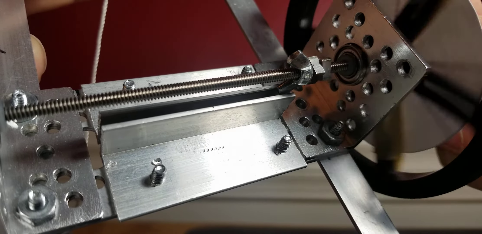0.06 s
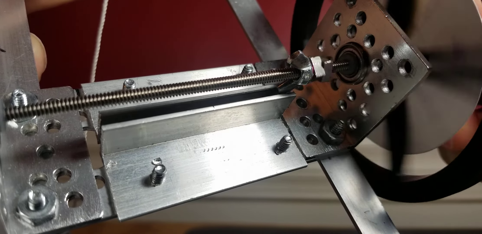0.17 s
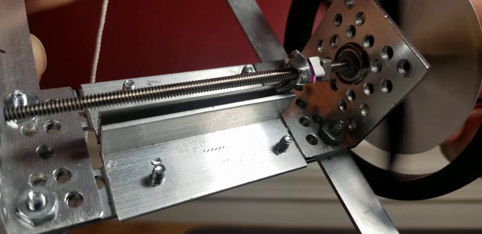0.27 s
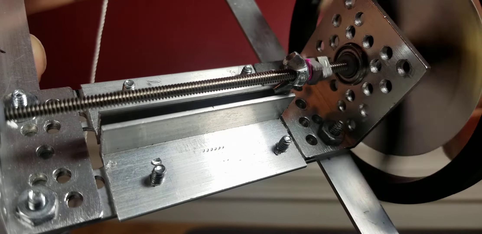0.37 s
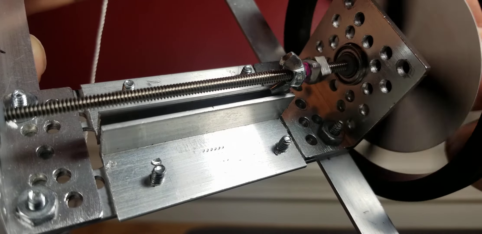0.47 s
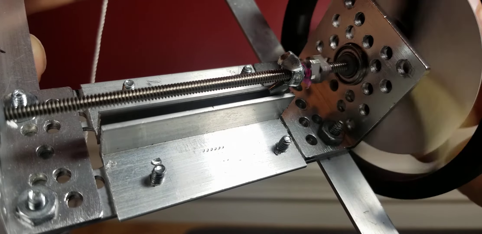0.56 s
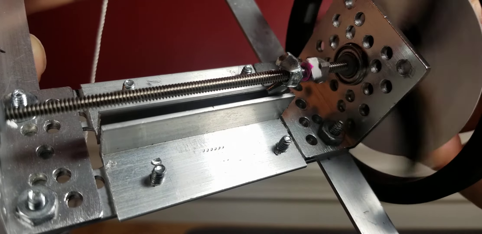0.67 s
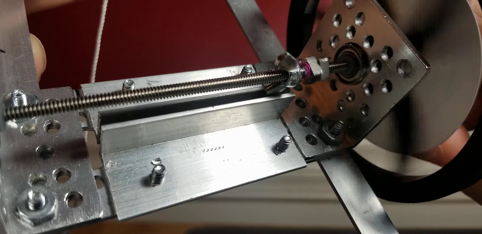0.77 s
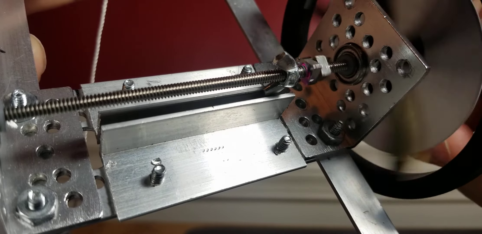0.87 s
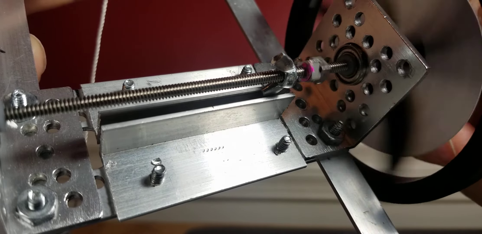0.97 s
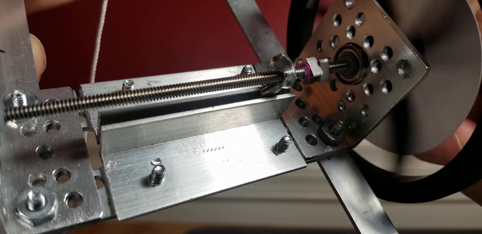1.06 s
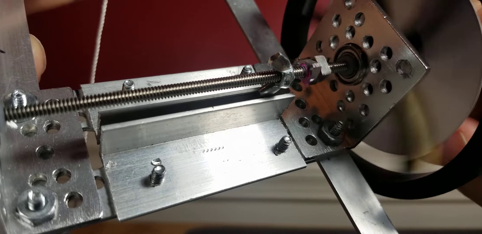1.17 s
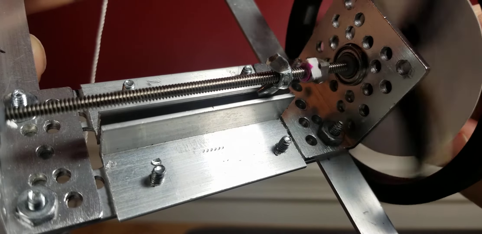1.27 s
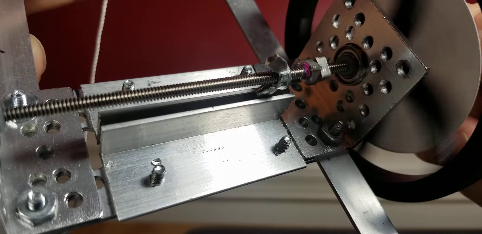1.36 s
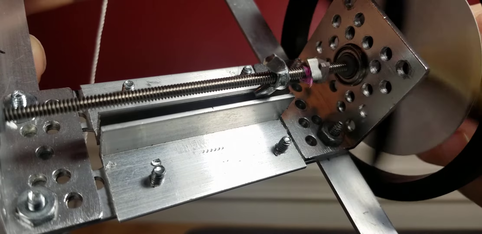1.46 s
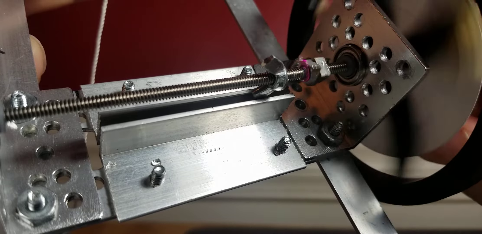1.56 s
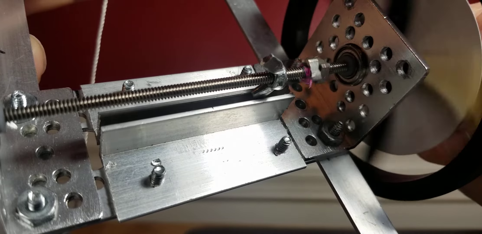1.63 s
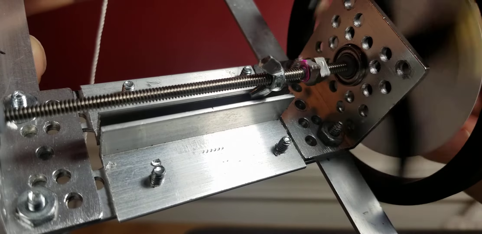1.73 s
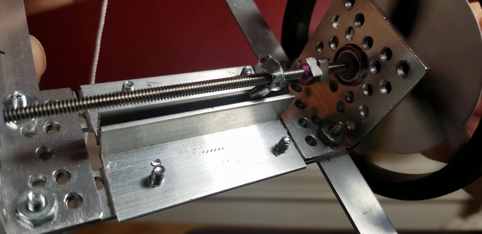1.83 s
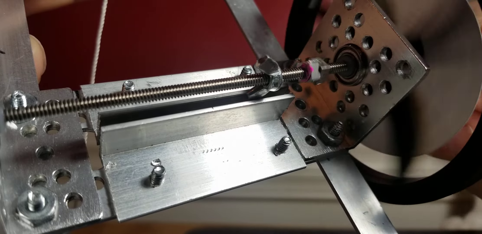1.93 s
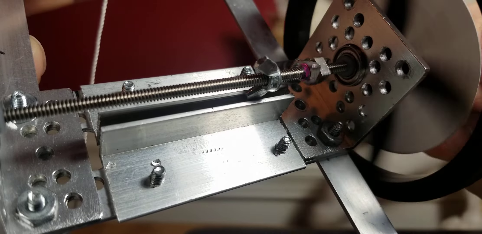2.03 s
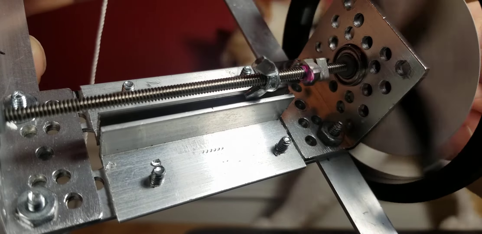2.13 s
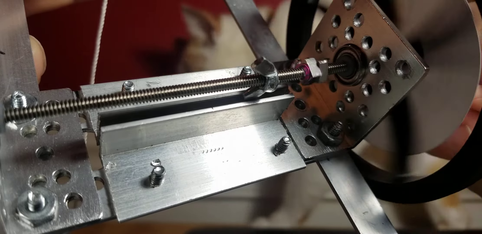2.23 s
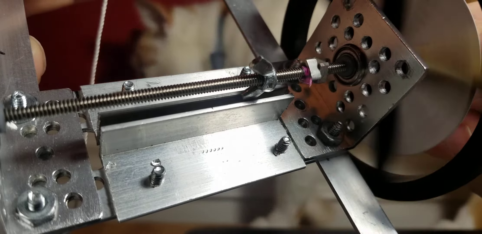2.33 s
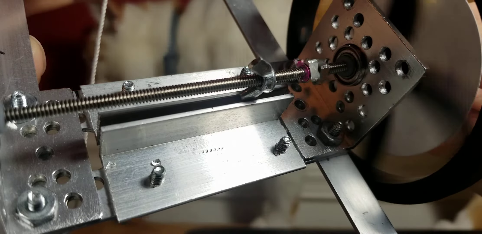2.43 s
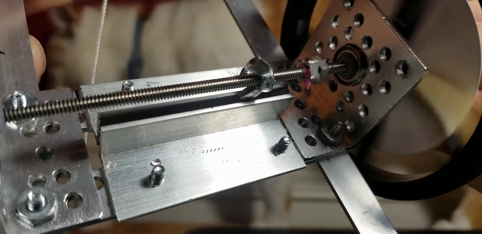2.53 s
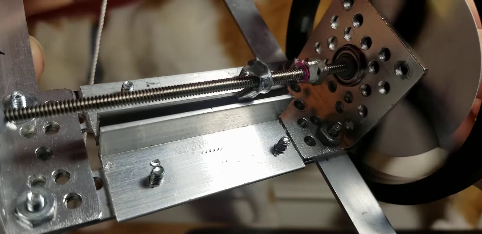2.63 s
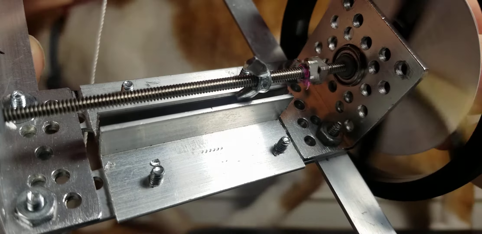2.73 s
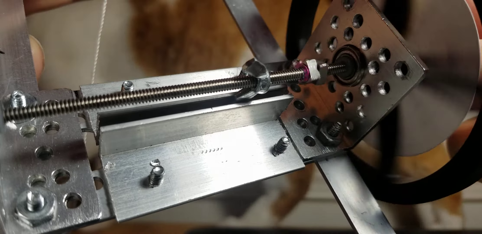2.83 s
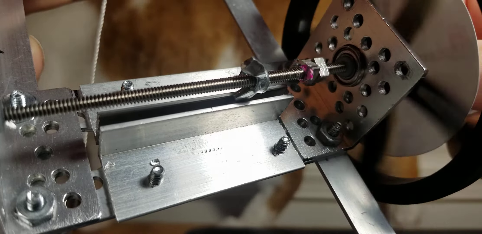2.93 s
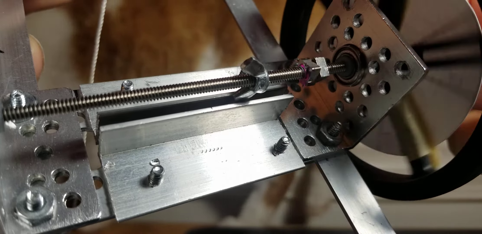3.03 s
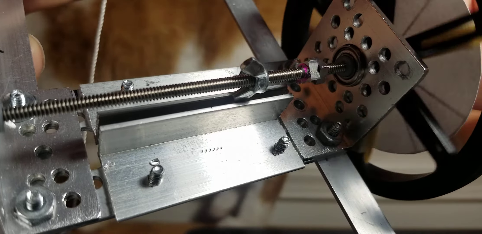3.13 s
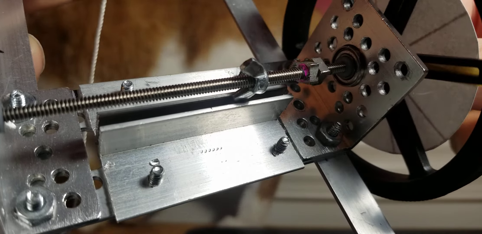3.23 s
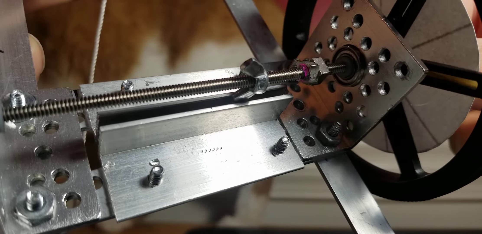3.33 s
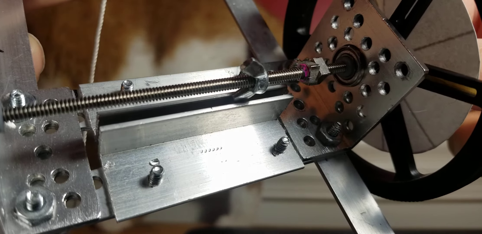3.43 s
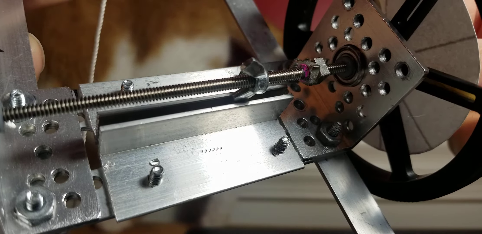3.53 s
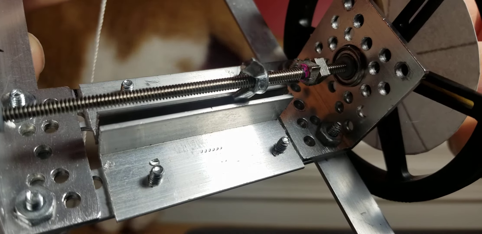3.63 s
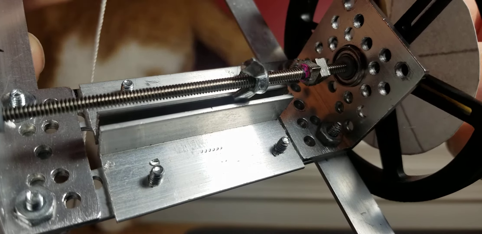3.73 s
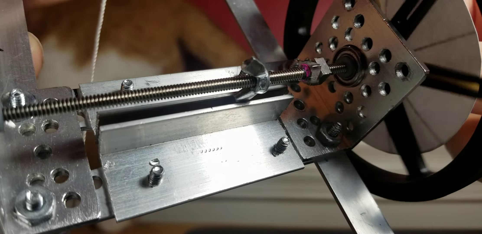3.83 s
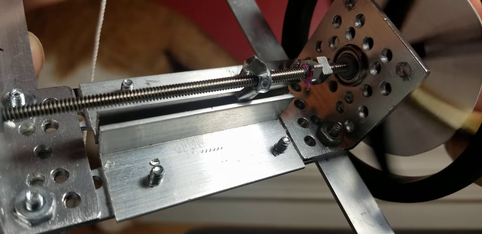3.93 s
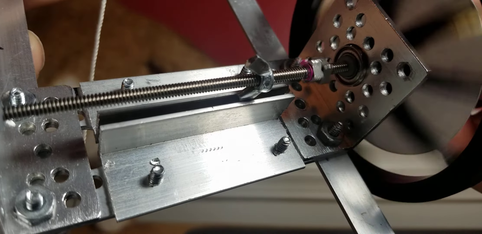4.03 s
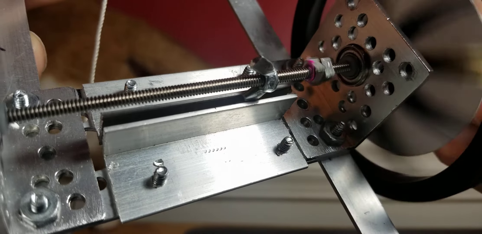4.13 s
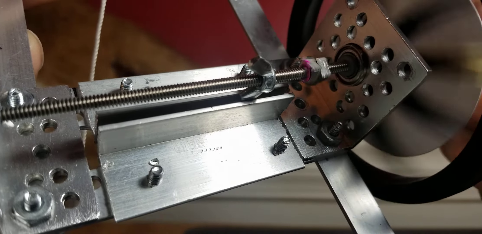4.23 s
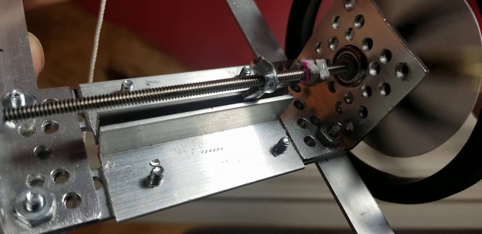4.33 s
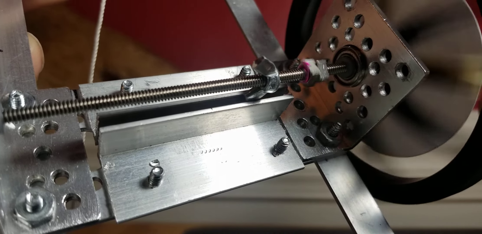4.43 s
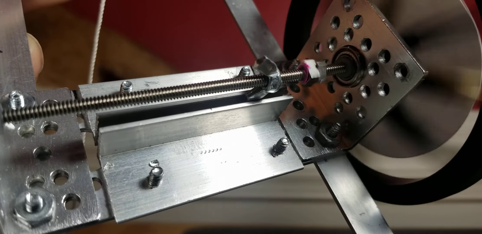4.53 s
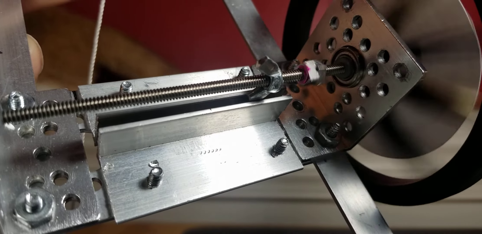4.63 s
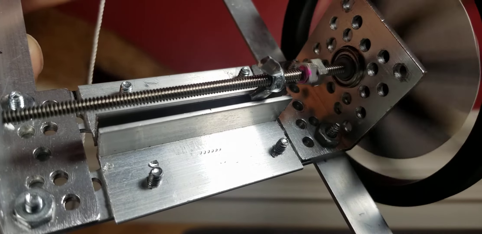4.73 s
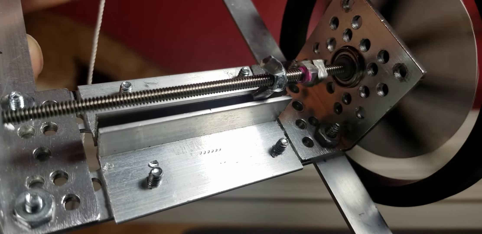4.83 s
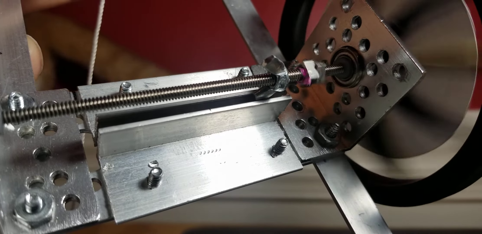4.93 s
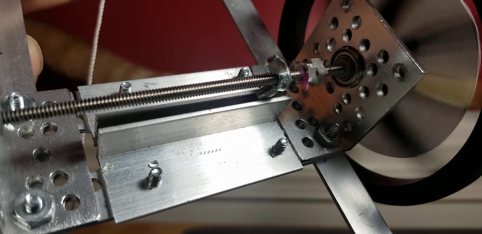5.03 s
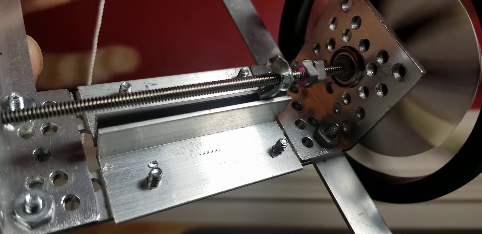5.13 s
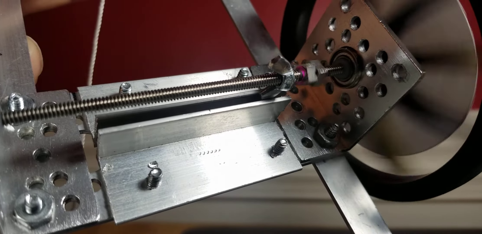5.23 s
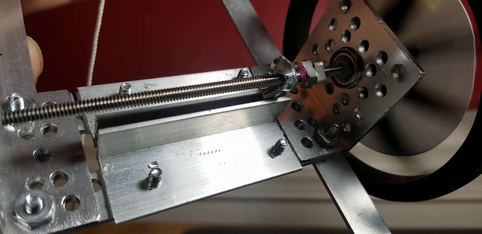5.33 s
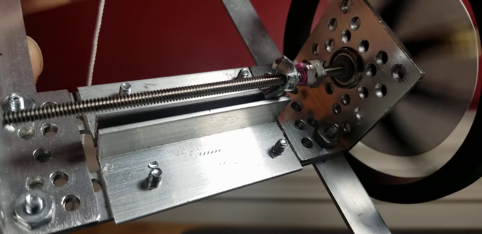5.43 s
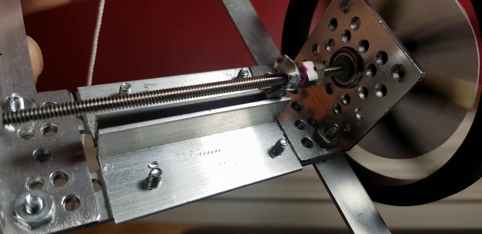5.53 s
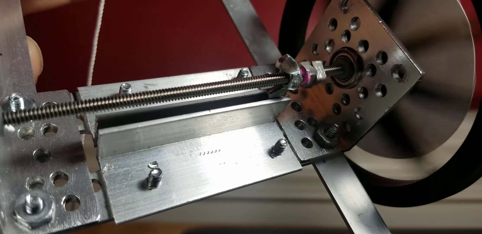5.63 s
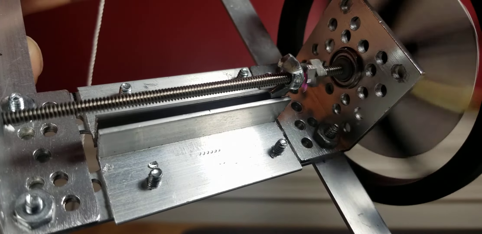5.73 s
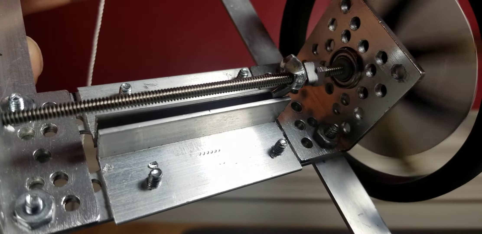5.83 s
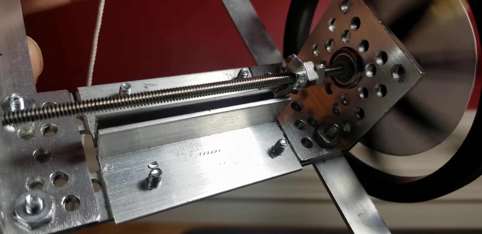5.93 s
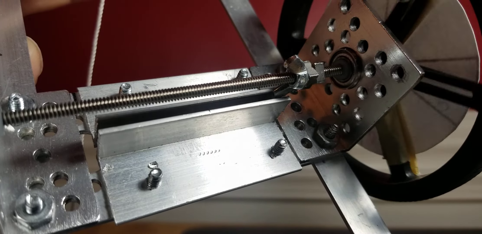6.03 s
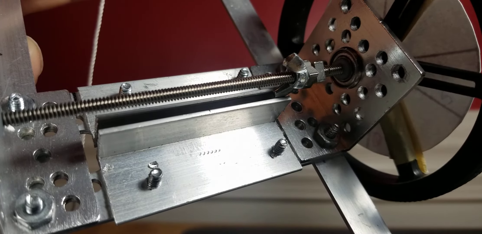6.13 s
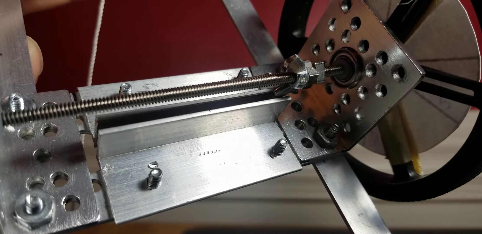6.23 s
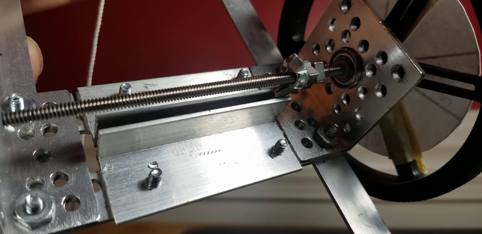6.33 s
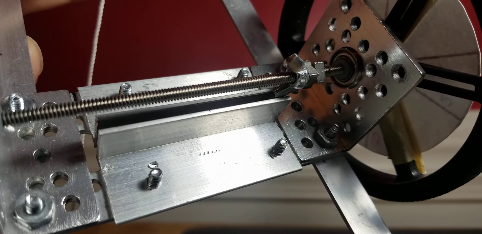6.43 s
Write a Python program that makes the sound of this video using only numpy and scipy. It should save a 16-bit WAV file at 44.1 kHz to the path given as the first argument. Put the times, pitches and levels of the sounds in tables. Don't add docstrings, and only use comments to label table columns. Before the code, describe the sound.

Close metallic buzzing rattle of a loose nut on a spinning threaded axle, two bursts, handling thumps, a brief squawk, then an abrupt stop.

```python
import sys
import numpy as np
from scipy import signal
from scipy.fft import rfft, irfft, next_fast_len
from scipy.io import wavfile
from scipy.ndimage import uniform_filter1d

SR = 44100
rng = np.random.default_rng(int(sys.argv[2]) if len(sys.argv) > 2 else 0)


def materialize(psi):
    bounded = np.clip(np.atleast_2d(psi).T, -1, 1)
    quanta = np.round(bounded * 32767).astype(np.int16)
    wavfile.write(sys.argv[1], SR, quanta)


def elevation(decibels):
    levels = np.asarray(decibels, float)
    return 10 ** (levels / 20)


N = 286209
T = np.arange(N) / SR
HZ = np.fft.rfftfreq(2 * next_fast_len(N // 2 + 6000, True), 1 / SR)

# time_s, drag_db, frame_looseness_db
COASTING = [
    [(0.0, -67, -64), (0.178, -62.5, -74), (0.318, -55.5, -62.5), (0.44, -56, -58.5), (0.74, -58.5, -62.5)],
    [(2.0, -53, -60), (2.15, -67, -73), (2.298, -57, -61), (2.438, -57.5, -65), (2.978, -57.5, -69),
     (3.282, -55, -90), (3.732, -60, -89), (3.87, -64.5, -75), (3.92, -54, -57)],
    [(5.87, -44, -78), (5.966, -67.5, -73), (6.066, -58, -81), (6.126, -68, -99), (6.21, -81, -99),
     (6.27, -97.5, -99), (6.49, -98, -99)],
]
# frequency_hz, level_db
FRICTION_COLOUR = [(290, -52), (500, -15.5), (900, -17.5), (1190, -8.5), (1550, -8), (1800, -11),
                   (2230, -12), (2850, -15.5), (3340, -5), (5800, -1.5), (9090, -8.5), (11300, -3.5),
                   (16000, -3.5)]
# time_s, pitch_hz, level_db
BEARING_MOAN = [(2.9, 2020, -79), (3.1, 1960, -79), (3.33, 1950, -71), (3.4, 1530, -76), (3.7, 1530, -72),
                (3.8, 1550, -70), (3.86, 1500, -88)]
# time_s, pitch_hz, level_db
BEARING_SQUAWK = [(3.87, 3005, -66), (3.9, 2900, -46.5), (4.0, 2696, -43), (4.1, 2455, -46),
                  (4.14, 2510, -85.5)]
# time_s, share_removed
FINGER_DAMPING = [(1.99, 0.02), (2.04, 0.72), (2.5, 0.66), (2.6, 0.072), (2.95, 0.36), (3.1, 0)]
# frequency_hz, width_hz, level_db
CASE_MODES = [(54.4, 28.5, 0), (112.2, 58, -2.5), (162.7, 96, -8.5), (313.6, 114, -1), (530, 283, -11)]
# time_s, effort_db, firmness_db (gained by each higher resonance)
HAND_GRIP = [(0, -57.5, 6.5), (.27, -53, -2), (.6, -53.5, -3), (.8, -45.5, -3.5), (1.01, -53.5, 1),
             (1.43, -51, -7), (1.75, -50, -7), (2.0, -52, -4.5), (2.5, -60, -9.5), (2.91, -65, -0.5),
             (3.6, -59.5, -9.5), (3.76, -60.5, -6), (3.96, -51.5, -4.5), (4.36, -56, -6), (4.64, -58.5, -1),
             (5.3, -59.5, 0.5), (5.75, -56, -2.5), (6.3, -57, -15.5)]
# peak_s, peak_db, brightness (0 deep to 2 upper), t60_s
FINGER_JOLTS = [(.05, -53, 0.53, 0.42), (.36, -38, 0.32, 0.87), (.47, -38, 0.33, 0.69),
                (.87, -34.5, 0.63, 0.62), (1.02, -54, 2, 2.7), (1.598, -35, 1.51, 0.63),
                (2.28, -44, 0.35, 1.6), (2.55, -48.5, 0.16, 1.9), (4.01, -39, 0.53, 0.71),
                (4.109, -41.5, 2, 0.51), (4.119, -29, 0.31, 0.38), (5.351, -32, 1.12, 0.64),
                (5.42, -42, 0.54, 0.6), (5.48, -36.5, 0.91, 0.68), (5.93, -41, 0.54, 0.54),
                (5.98, -42, 0.15, 0.11), (6.02, -47.5, 1.55, 0.54)]
# start_s, peak_db, pitch_hz, t60_s, left_right_db
HAND_THUMPS = [(0.009, -33.5, 54, 0.92, 3.5), (0.047, -34, 197, 0.26, 7), (0.35, -28, 46.8, 0.41, 4),
               (0.498, -32.5, 191, 0.17, 6), (0.858, -16.5, 208, 0.063, 5), (1.59, -26, 331.5, 0.054, -3),
               (1.588, -33.5, 581, 0.085, -1), (4.108, -28, 58, 0.22, -18), (4.137, -36, 95.2, 0.43, -15),
               (5.34, -4, 181, 0.026, 5.5), (5.35, -30, 55.7, 0.53, 5), (5.472, -18, 206, 0.11, 4),
               (5.91, -36.5, 312, 0.047, 7), (6.004, -17.5, 449, 0.031, 13), (6.016, -19, 356, 0.02, -4),
               (6.043, -43, 383, 0.039, 6)]
# start_s, peak_db, pitch_hz, t60_s,
# left_right_db
SOFT_BUMPS = [(2.546, -56, 610, 0.05, -3), (2.583, -49, 625, 0.076, -1), (6.008, -38.5, 990, 0.037, 8),
              (1.544, -34.5, 185, 0.23, 0), (1.612, -31.5, 202.6, 0.2, 5), (6.016, -26, 100, 0.1, -6),
              (6.146, -34.5, 103, 0.064, -13), (6.002, -35, 4527, 0.045, 6), (6.002, -37, 8100, .03, 6),
              (6.015, -43, 5600, .04, 6), (5.5, -32, 172, 0.34, 5), (5.36, -27.5, 190, 0.3, 5)]
# time_s, pitch_hz, level_db
ELECTRIC_WHINE = [(0, 13400, -77), (.72, 13350, -76), (.8, 13400, -99), (6.05, 13400, -99),
                  (6.15, 13500, -89), (6.49, 13700, -89)]
# start_s, peak_db, low_share_db, left_right_db
AXLE_TICKS = [(0.212, -54, -1, 7), (0.2882, -41, -12, 8), (0.4444, -30, -18, 6.5), (0.482, -44, -16, 15.5),
              (0.508, -47.5, 2.5, 3), (0.5707, -29.5, -22.5, 15.5), (0.631, -54, -22, 25.5),
              (0.641, -43.5, -11.5, 19), (2.088, -55, 2, 3), (2.169, -25.5, -21.5, 7),
              (2.1797, -43, -10, 5), (2.2798, -47, -7, 7), (2.306, -39, -10.5, 8.5), (2.353, -52, -1, 13),
              (2.544, -25.5, -30, 17), (2.58, -26, -30, 20), (2.5868, -28, -23, 18.5), (2.598, -48, -16, 8),
              (2.613, -52, -20, 8), (2.62, -22.5, -36, 15), (2.7893, -27, -20.5, 4.5),
              (2.7925, -38, -27, 12), (2.797, -30, -22, 5), (2.809, -35, -18, -1), (2.823, -33, -22, 9),
              (2.8395, -44, -7, -11), (2.8783, -59.5, 11.5, 7)]
# start_s, peak_db,
# low_share_db, left_right_db
SPIN_CLICKS = [(0.741, -34, -8, 4), (0.7615, -26, -25, 10), (3.8017, -32, -21, 6),
               (3.904, -23.5, -24, 2.5), (4.249, -19, -28, 4), (4.26, -22, -24, 9), (4.459, -22, -33, 4),
               (4.4998, -16.5, -25.5, 8), (6.002, -16.5, -30.5, 9.5), (6.0124, -42, -7, 3),
               (6.087, -38, -23, 6), (0.043, -57, -11, -2)]
# start_s, length_s, peak_db, low_share_db, left_right_db
PLAY_SCRAPES = [
    (0.025, 0.16, -64.5, 0, -1),
    (0.419, 0.011, -52, -1.5, 10.5),
    (2.255, 0.01, -39, -17, 8),
    (2.537, 0.013, -37.5, -13, 5.5),
    (2.576, 0.015, -27, -22, 0),
    (2.763, 0.036, -30.5, -25.5, 14),
    (2.82, 0.023, -47, -10, 3),
    (6.001, 0.019, -41, -7.5, -4),
]
# time_s, contact_db, nut_ring_db
CONTACT_OUT = [(0.737, -53.5, -3), (0.763, -38.5, -12), (0.79, -40, -20), (0.89, -40, -7),
               (1.08, -41.5, -10), (1.22, -41.5, -10), (1.52, -42.5, -2.5), (1.997, -42.5, -5.5),
               (2.008, -85, -11)]
CONTACT_BACK = [(3.93, -100, -9), (3.94, -41, -20), (3.988, -31.5, -45), (4.17, -29.5, -30),
                (4.27, -30.5, -12.5), (4.52, -33.5, -4), (5.2, -38, -2.5), (5.857, -36.5, -9),
                (5.877, -72, -3.5)]
# time_s, peak_db
FIRM_BLOWS_OUT = [(0.762, -22.5), (0.7851, -25.5), (0.821, -26), (0.8321, -25.5), (0.8666, -26.0),
                  (0.8828, -28), (0.893, -24.0), (0.9332, -23.5), (0.9385, -35), (0.961, -25.0),
                  (0.9897, -29), (1.0115, -27.5), (1.0404, -23.5), (1.0577, -27.5), (1.0853, -28),
                  (1.0909, -29.5), (1.1197, -29.5), (1.143, -25.5), (1.1649, -24.5), (1.1994, -26.0),
                  (1.2103, -27.0), (1.2226, -25.5), (1.256, -26.5), (1.2735, -26.5), (1.307, -26.5),
                  (1.3306, -28.5), (1.353, -25.5), (1.3645, -27.0), (1.3759, -25.0), (1.399, -26.5),
                  (1.428, -35), (1.454, -28.5), (1.466, -34), (1.4996, -31), (1.5227, -32), (1.5356, -28.5),
                  (1.5604, -27.5), (1.589, -33), (1.6144, -31), (1.6222, -33), (1.65, -35), (1.6733, -29),
                  (1.7058, -27.5), (1.7282, -31), (1.738, -32.5), (1.7716, -30), (1.7853, -26),
                  (1.797, -32.5), (1.8318, -35), (1.8439, -33.5), (1.8734, -27.0), (1.8998, -26.5),
                  (1.9251, -29.5), (1.9334, -28), (1.9606, -28), (1.9725, -35)]
FIRM_BLOWS_BACK = [(3.9587, -23), (3.996, -21), (4.0157, -17), (4.0378, -18), (4.094, -19), (4.1558, -27),
                   (4.1797, -20), (4.1987, -20), (4.2478, -32.0), (4.2603, -18), (4.3093, -23),
                   (4.341, -20), (4.368, -23), (4.4046, -22.5), (4.4412, -25), (4.462, -27), (4.4998, -25),
                   (4.5352, -21), (4.5458, -22.0), (4.59, -25), (4.6188, -18), (4.6608, -22), (4.6903, -24),
                   (4.7341, -22), (4.7643, -26), (4.7928, -25), (4.825, -14), (4.8534, -20), (4.8847, -27),
                   (4.909, -10), (4.9608, -26), (4.966, -25), (5.0137, -21.5), (5.0537, -21),
                   (5.0643, -23.5), (5.1005, -21.0), (5.1243, -22), (5.1772, -21), (5.2043, -24.0),
                   (5.2249, -24.5), (5.2582, -23), (5.3, -21), (5.3429, -40), (5.3619, -29), (5.3982, -33),
                   (5.4195, -26), (5.4542, -24), (5.4849, -27), (5.5145, -33), (5.556, -30), (5.5784, -29),
                   (5.6128, -30), (5.6584, -21), (5.6802, -26.0), (5.7042, -29), (5.7373, -23),
                   (5.7873, -25), (5.8174, -29), (5.8317, -21)]
# frequency_hz, width_hz, level_db
FRAME_MODES_OUT = [(334, 57, -7), (1074, 58, -8), (1903, 130, -9.5), (2316, 130, -9), (2796, 145, -8.5),
                   (4550, 220, -10.5), (6370, 490, 0.5), (7760, 400, -4), (9460, 520, -7), (11200, 800, -2)]
FRAME_MODES_BACK = [(603, 97, -21.5), (1050, 60, -18), (1940, 150, -23), (2350, 60, -21), (2722, 90, -13),
                    (5000, 200, -14), (5430, 100, -18), (6430, 300, -9), (8790, 320, -14.5),
                    (10200, 300, -16.5), (10900, 130, -12.5), (11840, 230, -2), (12850, 380, -11.5),
                    (13420, 200, -19)]
# frequency_hz, level_db
DENSE_RINGING_OUT = [(600, -54.5), (1400, -24), (2200, -21), (3250, -20), (4000, -10), (5000, -15),
                     (5600, -7.5), (8600, -16), (10500, -12), (13000, -7.5), (14500, -15), (15700, -8.5)]
DENSE_RINGING_BACK = [(600, -69.5), (1350, -31.5), (2200, -26.5), (3100, -28), (4200, -25), (5700, -19),
                      (8000, -26), (8400, -29.5), (9500, -33.5), (10550, -31), (14000, -28.5),
                      (15700, -17.5)]
# start_s, length_s, depth_db
NUT_SLIPS = [(0.904, 0.015, -7), (1.087, 0.016, -1), (1.432, 0.043, -4.5), (4.114, 0.036, -18),
             (4.214, 0.039, -17), (4.348, 0.023, -5), (4.372, 0.027, -18), (4.464, 0.035, -22),
             (5.13, 0.014, 0), (5.24, 0.012, -0.5), (5.269, 0.024, -6), (5.576, .012, -11),
             (5.692, 0.027, 0), (5.75, 0.034, -6)]
# time_s, rubbing_against_blows_db
NUT_DRAG = [(.74, -12), (1.36, -16), (1.45, 5), (3.93, 4), (4.1, 3), (4.16, -14), (4.52, -14), (4.62, -8),
            (5.25, -5), (5.35, -1), (5.87, -3)]
# middle_s, length_s, lift_db
BRACKET_SINGS = [(0.788, .03, 9.5), (0.935, .05, 8), (1.08, 0.029, 10), (1.234, 0.058, 8), (1.551, .04, 8),
                 (1.736, .04, 5.5), (1.883, 0.041, 8), (4.103, .03, 5.5), (4.647, .04, 0.5), (4.75, .04, 0),
                 (5.09, 0.039, 6.5), (5.29, .04, 4.5), (5.432, 0.044, 6), (5.56, 0.06, 5.5)]
# time_s, pitch_hz, level_db
ROD_DRONES = [
    [(.85, 301.2, -61.5), (.95, 337.4, -50), (1.05, 337.4, -46), (1.17, 354, -51.5), (1.33, 345, -49.5),
     (1.5, 329, -76), (1.9, 330.7, -60), (2.0, 327, -74)],
    [(.85, 538, -78.5), (.95, 539, -66), (1.2, 530, -61), (1.4, 530, -67.5), (1.5, 526, -90)],
    [(.9, 174, -77), (1.05, 170, -41.5), (1.2, 182.2, -51), (1.35, 172.5, -46), (1.5, 169.7, -59),
     (1.9, 164, -66), (2.0, 166.6, -83)],
]
# frequency_hz, left_right_db
PORT_BALANCE = [(60, 5), (110, -10), (200, -18.5), (380, -4), (700, 6), (1290, 2.5), (2380, 5.5),
                (4400, 4.5), (8120, 5), (15000, 10)]


def evened(x):
    return x / np.sqrt(np.mean(x ** 2) + 1e-20)


def read(points):
    f, value = np.transpose(points)
    return np.interp(np.log(HZ + 1), np.log(f), value)


def follow(tables, column, off):
    rows = np.concatenate([np.array(t, float) for t in tables])
    return np.interp(T, rows[:, 0], rows[:, column], off, off)


def shape(x, gain):
    size = 2 * (len(HZ) - 1)
    return irfft(rfft(x, size) * gain, size)[..., :N]


def edge(hz, order=4):
    return 1 / np.sqrt(1 + (HZ / hz) ** (2 * order))


def peak(hz, width):
    return 1 / (1 + (2 * (HZ - hz) / width) ** 2)


def wander(hz):
    knots = rng.standard_normal(N // 64 + 2)
    slow = signal.lfilter([1], [1, -np.exp(-2 * np.pi * hz * 64 / SR)], knots)
    return np.interp(np.arange(N) / 64, np.arange(len(slow)), evened(slow))


def gliding_tone(voice):
    phase = 2 * np.pi * np.cumsum(follow([voice], 1, 0)) / SR
    return elevation(follow([voice], 2, -140)) * np.cos(phase)


def add(mix, s, sound, pan_db):
    part = mix[:, round(s * SR):][:, :sound.shape[-1]]
    part += (sound * elevation([[pan_db / 2], [-pan_db / 2]]))[:, :part.shape[1]]


def frame(modes, bed):
    power = elevation(2 * read(bed))
    for hz, width, db in modes:
        power += elevation(2 * db) * peak(hz, width) ** 1.236
    cepstrum = irfft(np.log(power) / 2)
    cepstrum[1:len(HZ) - 1] *= 2
    cepstrum[len(HZ):] = 0
    return np.exp(rfft(cepstrum))


def damped(x):
    lower = peak(1900, 300) + peak(1075, 240) + 0.6 * peak(3150, 354) + 0.21 * peak(1800, 440)
    share = np.clip(follow([FINGER_DAMPING], 1, 0), 0, 1)
    return x - share * shape(x, np.minimum(lower, 1))


def coast(body):
    noise = rng.standard_normal((4, N)) * elevation(0.9 * wander(30))
    hiss = evened(shape(noise[:2] + 0.5 * noise[2], elevation(read(FRICTION_COLOUR))))
    sheen_db = -6
    whisper = hiss + shape(hiss, 1 - edge(8000)) * (elevation(sheen_db) - 1)
    shaking = noise[2:] + 0.5 * noise[0]
    low_band = edge(2900, order=8) * (1 - edge(800)) * (1 - 0.8 * peak(1600, 500))
    high_band = edge(8300, order=8) * (1 - edge(3900, order=8))
    ring = evened(shape(shaking, abs(body) ** 1.5 * low_band))
    ring += elevation(-9.5) * evened(shape(shaking, abs(body) ** 0.9 * high_band))
    moan = evened(shape(noise[:2], edge(69, order=2))) * gliding_tone(BEARING_MOAN)
    squawk = evened(shape(noise[2:], edge(340, order=2))) * gliding_tone(BEARING_SQUAWK)
    drag = elevation(follow(COASTING, 1, -140))
    looseness = elevation(follow(COASTING, 2, -140) - 0.5 + 1.7 * wander(1.7))
    return damped(drag * whisper + looseness * ring) + moan + squawk


def rumble_db(step):
    rise_s, spread_db = 0.036, -12
    grip_db = follow([HAND_GRIP], 1, -58.5) + step * follow([HAND_GRIP], 2, -13.5)
    body_db = 5.5 * (step == 1)
    power = elevation(2 * (grip_db + body_db))
    for s, db, bright, t60 in FINGER_JOLTS:
        shape_db = np.where(T < s, 20 * (T - s) / rise_s, -60 * (T - s) / t60)
        power = power + elevation(2 * np.maximum(db + spread_db * abs(step - bright) + shape_db, -150))
    return 10 * np.log10(power)


def hands():
    out = np.zeros((2, N))
    groups = [(CASE_MODES[:1], 0.5), (CASE_MODES[1:3], 1.1), (CASE_MODES[3:], 1.2)]
    for step, (modes, apart) in enumerate(groups):
        noise = rng.standard_normal((3, N))
        gain = sum(elevation(db) * peak(hz, width) for hz, width, db in modes)
        band = shape(noise[0] + apart * noise[1:], gain * (1 - edge(29, order=2)))
        out += evened(band * elevation(2.1 * wander(12.0))) * elevation(rumble_db(step))
    t = np.arange(12000) / SR
    scuffs = evened(shape(rng.standard_normal((2, N)), edge(1200, order=2) * (1 - edge(600))))
    for s, db, hz, t60, pan_db in HAND_THUMPS:
        scuff_db = -45 + 0.34 * db + 4 * np.log2(hz / 200)
        scuff = np.roll(scuffs, -round(s * SR), axis=1)[:, :len(t)]
        add(out, s, elevation(scuff_db - 60 * t / (1.5 * t60)) * scuff, pan_db)
    for s, db, hz, t60, pan_db in HAND_THUMPS + SOFT_BUMPS:
        onset = 1 - np.exp(-t / 0.004)
        add(out, s, elevation(db - 60 * t / t60) * np.sin(2 * np.pi * hz * t) * onset, pan_db)
    return out


def whine():
    hz = follow([ELECTRIC_WHINE], 1, 0) + 40 * wander(80)
    level = elevation(follow([ELECTRIC_WHINE], 2, -140) + 3.9 * wander(40))
    tone = level * np.sin(2 * np.pi * np.cumsum(hz) / SR)
    air = evened(shape(rng.standard_normal((2, N)), 1.6 - edge(11000)))
    return tone + elevation(-80) * air


def ticks(body):
    high, low = np.zeros((2, N)), np.zeros((2, N))
    t = np.arange(4000) / SR
    snap = (elevation(-60 * t / 0.023) + elevation(5 - 60 * t / 0.004)) * (1 - np.exp(-t / 0.0002))
    grain = elevation(3 * wander(300))
    events = [(s, snap, *rest) for s, *rest in AXLE_TICKS + SPIN_CLICKS]
    for s, length, *rest in PLAY_SCRAPES:
        swell = np.minimum(t / (0.26 * length), 1)
        stop = elevation(-60 * np.maximum(t - length, 0) / 0.014)
        events.append((s, swell * stop * grain[round(s * SR):][:len(t)], *rest))
    noise = rng.standard_normal((len(events), 3, len(t)))
    for (s, envelope, db, low_db, pan_db), z in zip(events, noise):
        burst = elevation(db) * envelope * evened(z[0] + z[1:])
        add(high, s, burst, pan_db - 9.5)
        add(low, s, burst * elevation(low_db), pan_db - 1.5)
    split = edge(4100, order=2)
    body = body / np.sqrt(np.mean(abs(body) ** 2))
    bright_body = body * (1 + elevation(-3.5) * peak(11800, 200)) + elevation(-19) * (1 - edge(9000))
    bright = shape(high, bright_body * (1 - split) * elevation(-12.5))
    return bright + shape(low, body * split * elevation(11.5))


def room(x, t60, treble_t60, wet_db):
    t = np.arange(SR // 2) / SR
    noise = rng.standard_normal((2, SR // 2)) * (t > 0.004)
    dull = signal.sosfilt(signal.butter(2, 7000, fs=SR, output="sos"), noise)
    tail = dull * elevation(-60 * t / t60) + (noise - dull) * elevation(-60 * t / treble_t60)
    return x + elevation(wet_db) * signal.fftconvolve(x, tail / np.linalg.norm(tail[0]), axes=1)[:, :N]


def slack():
    sag_curve, bite_s, bite_db, settle_s = 0.3, 0.0038, -2, 0.025
    db = np.zeros(N)
    for s, length, depth_db in NUT_SLIPS:
        after = np.maximum(T - s - length, 0)
        back = np.minimum(after / bite_s, 1)
        db += depth_db * np.clip((T - s) / length, 0, 1) ** sag_curve * (1 - back)
        db += bite_db * back * np.exp(-after / settle_s)
    return db


def beats(spin, firm, per_s, sag, jitter, spread_db, firm_db, level_db):
    s = np.array([spin[0][0]] + [row[0] for row in firm] + [spin[-1][0]])
    rate = per_s - sag * (s[:-1] - s[0])
    in_gap = np.maximum(np.round(np.diff(s) * rate), 1)
    count = np.cumsum(np.r_[0, in_gap]).astype(int)
    luck = rng.standard_normal((600, 2))[:count[-1]]
    when = np.interp(np.arange(count[-1]), count, s) + jitter * luck[:, 0] / per_s
    size_db = spread_db * np.clip(luck[:, 1], -3, 1)
    strong = count[1:-1]
    when[strong] = s[1:-1]
    at = np.round(when * SR).astype(int)
    size_db[strong] = np.minimum(firm_db + np.array(firm)[:, 1] - level_db[at[strong]], 4)
    train = np.zeros(N)
    train[at] = elevation(size_db)
    return train


def sung(x):
    lift_db = sum(db * np.exp(-((T - s) / length * 2.2) ** 2) for s, length, db in BRACKET_SINGS)
    return x + (elevation(lift_db) - 1) * shape(x, peak(6460, 970) ** 2)


def chatter(spin, firm, body, per_s, sag, firm_db, jitter, wobble_db, rub_db, strike_db,
            low_db, low_lag, nut_lag):
    burst_s, apart = 0.0016, 2.2
    slip_db = slack()
    level_db = follow([spin], 1, -140) + slip_db
    blows = beats(spin, firm, per_s, sag, jitter, 1.5, firm_db, level_db) * elevation(wobble_db * wander(27))
    decay = np.exp(-1 / (burst_s * SR))
    puffs = evened(signal.lfilter([1], [1, -decay], uniform_filter1d(blows, size=24)))
    noise = rng.standard_normal((5, N))
    strikes = evened(blows * np.sign(noise[4]))
    hit = evened(puffs * evened(noise[0] + apart * noise[1:3]) + elevation(strike_db) * strikes)
    rub = evened(noise[3:] + 1.3 * noise[1]) * elevation(2.6 * wander(15))
    low = edge(7500, order=6)
    nut = np.minimum(peak(11800, 1000) ** 2 + peak(13100, 1300) ** 2, 1)
    drag = elevation(follow([NUT_DRAG], 1, -2.5))
    total = np.sqrt(1 + drag ** 2)
    bright = (hit + drag * rub) / total
    out = evened(shape(bright, body * (1 - low) * (1 - nut)))
    low_level_db = np.minimum(low_db + low_lag * (-35 - level_db), 8.5)
    low_ring = sung(evened(shape(hit + elevation(rub_db + 20) * rub, body * low)))
    out += elevation(low_level_db) * elevation(0.91 * wander(3.5)) * low_ring
    nut_ring = evened(shape(bright + strikes / total, body * nut))
    out += elevation(follow([spin], 2, 0) - nut_lag * slip_db) * nut_ring
    return elevation(level_db) * (level_db > -110) * out


def drones():
    noise = evened(shape(rng.standard_normal((len(ROD_DRONES), 2, N)), edge(13.5, order=2)))
    return sum((z[0] + 0.5 * z) * gliding_tone(voice) for voice, z in zip(ROD_DRONES, noise))


def scene():
    out_body = frame(FRAME_MODES_OUT, DENSE_RINGING_OUT)
    back_body = frame(FRAME_MODES_BACK, DENSE_RINGING_BACK)
    metal = damped(ticks(out_body))
    metal += chatter(CONTACT_OUT, FIRM_BLOWS_OUT, out_body, per_s=190, sag=9, firm_db=-9.5,
                     jitter=0.07, wobble_db=0.7, rub_db=-7.5, strike_db=-9,
                     low_db=-0.5, low_lag=0.19, nut_lag=0.71)
    metal += chatter(CONTACT_BACK, FIRM_BLOWS_BACK, back_body, per_s=195, sag=16, firm_db=-10.5,
                     jitter=0.15, wobble_db=-0.5, rub_db=-6.5, strike_db=-12,
                     low_db=-5.5, low_lag=0.32, nut_lag=0.1)
    metal = room(metal, t60=0.25, treble_t60=0.095, wet_db=-10.0)
    lean_db = read(PORT_BALANCE) / 2
    late = np.exp(-2j * np.pi * HZ * 18 / SR)
    at_ports = shape(metal, np.array([elevation(lean_db), elevation(-lean_db) * late]))
    in_case = (hands() + drones()) * elevation([[-1.5], [1.5]])
    return at_ports + coast(out_body) + in_case + whine()


def low_pass(x):
    return signal.sosfilt(signal.butter(12, 16950, fs=SR, output="sos"), x)


def record(dry):
    top = edge(15750, order=400) + elevation(-66) * edge(16900, order=60)
    mix = shape(dry, top)
    return low_pass(mix)


dry = scene()
out = record(dry)
materialize(out)
```